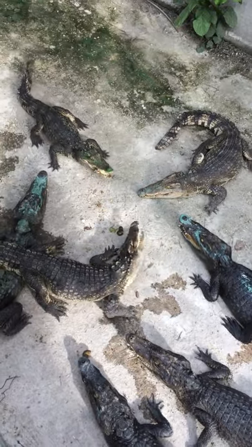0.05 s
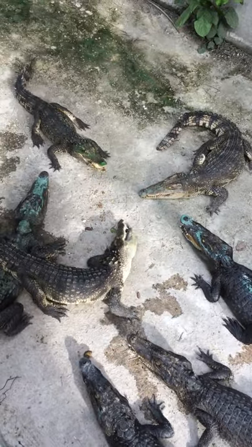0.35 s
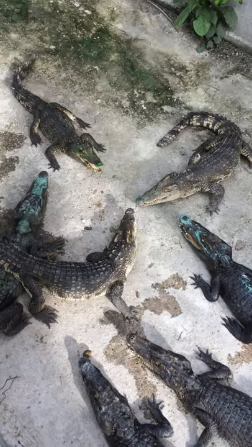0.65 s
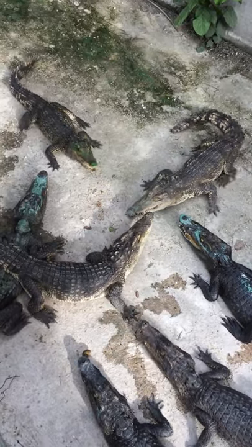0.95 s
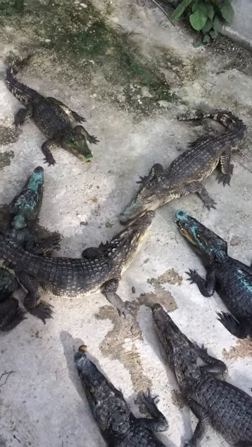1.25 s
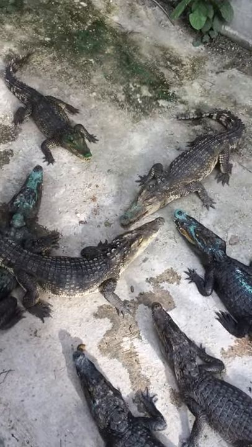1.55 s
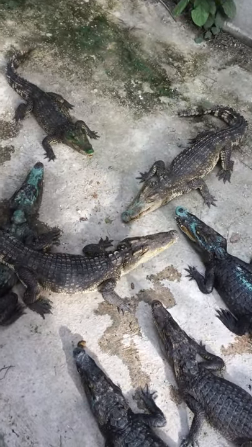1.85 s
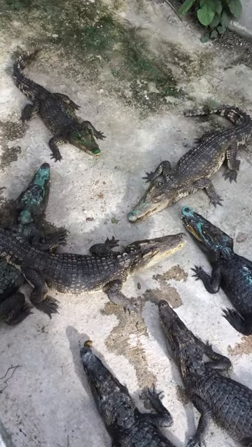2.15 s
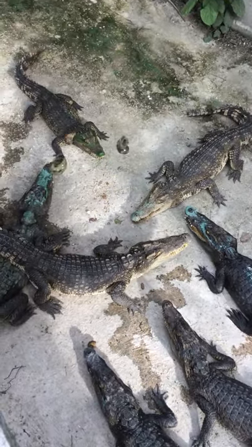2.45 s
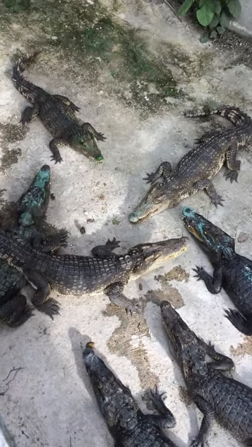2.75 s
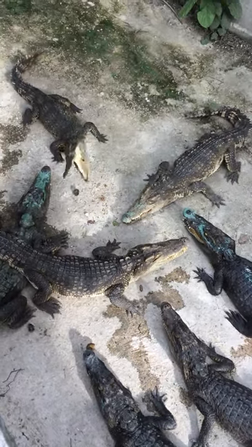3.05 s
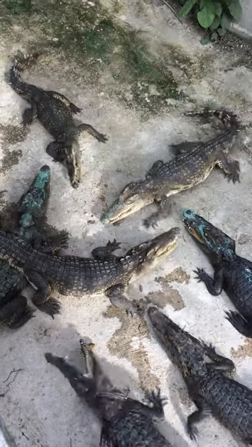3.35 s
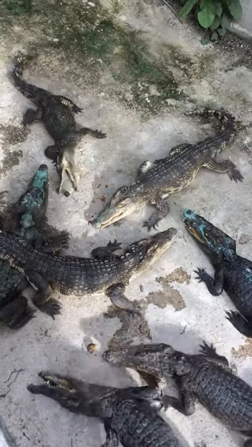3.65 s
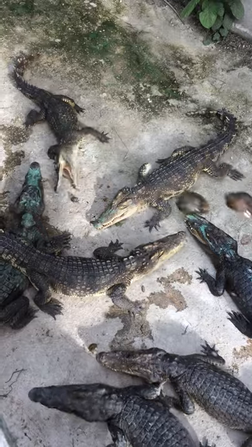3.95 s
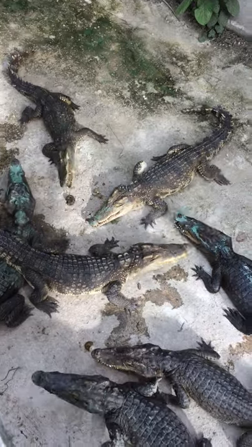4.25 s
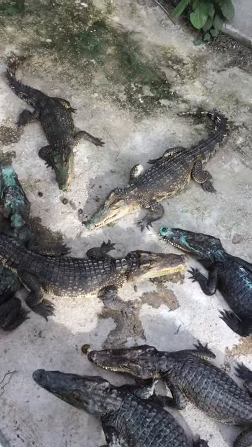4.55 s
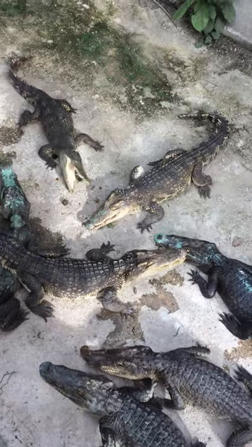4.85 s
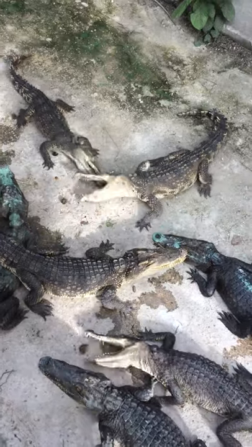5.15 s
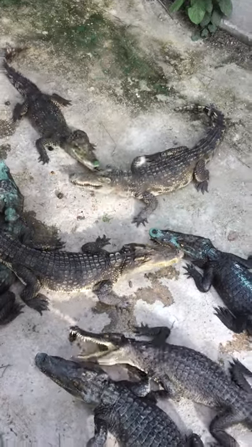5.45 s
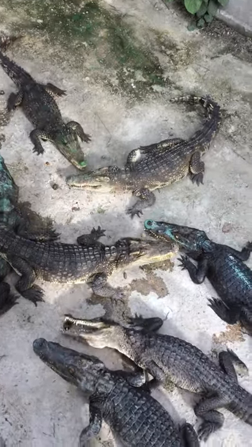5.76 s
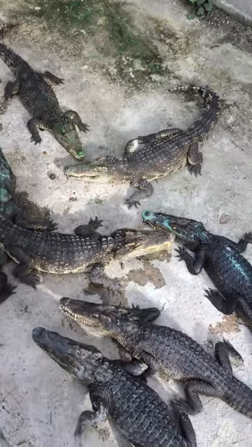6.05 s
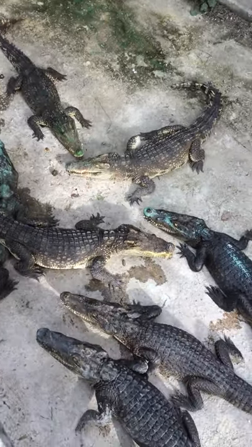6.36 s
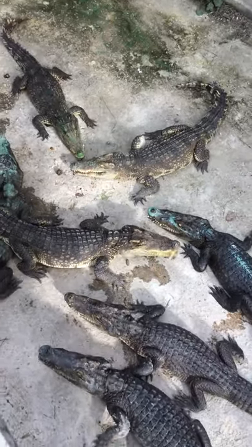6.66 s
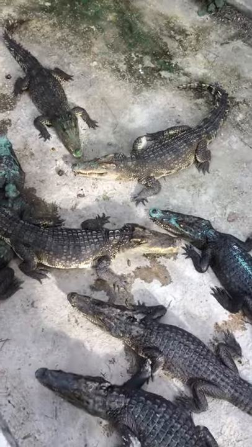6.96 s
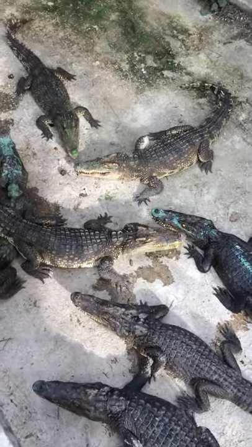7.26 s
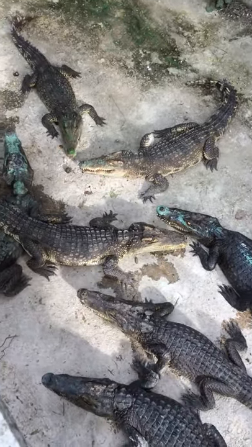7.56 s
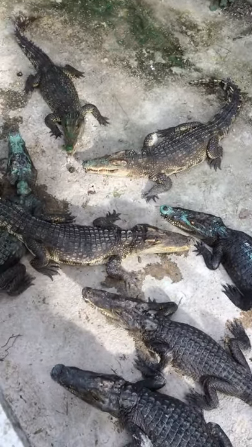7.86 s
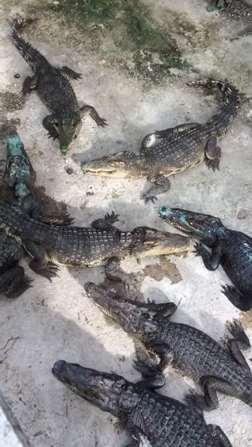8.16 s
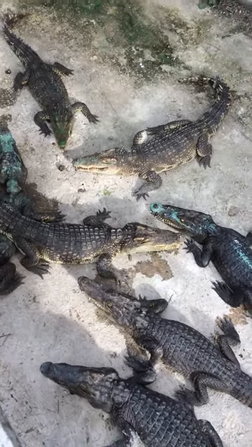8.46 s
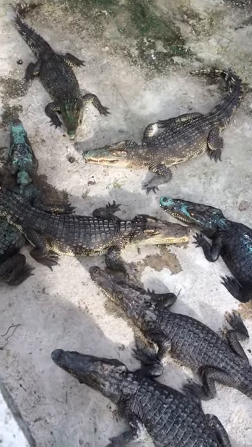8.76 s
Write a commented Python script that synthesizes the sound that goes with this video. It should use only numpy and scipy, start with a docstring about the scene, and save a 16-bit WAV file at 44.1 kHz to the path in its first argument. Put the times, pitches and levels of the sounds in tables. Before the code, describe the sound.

Crocodiles crunch hard shells with sharp, irregular cracks and drag over concrete, while a plastic pail knocks hollowly close by.

```python
"""Feeding time at a concrete crocodile pen, outdoors. First come hollow knocks close to the microphone,
probably a plastic feed pail, while snouts scuff and bellies drag out on the floor. Hard shells crack on
concrete and in jaws, loudest near 3 s and 4.5 s, with gritty crunches between; a faint hum grows.
The pail knocks again after 7 s, and the hardest crunches come last. Throughout, the walls answer briefly
over a low rumble; far whistles, perhaps birds, pass near 2 s and 6 s."""
import sys
import numpy as np
from scipy import signal
from scipy.fft import rfft, irfft, next_fast_len
from scipy.io import wavfile
from scipy.ndimage import map_coordinates

SR = 44100
rng = np.random.default_rng(int(sys.argv[2]) if len(sys.argv) > 2 else 0)


def generate_wav(sig):
    """Save sig (samples, or channels by samples) to the path in sys.argv[1] as 16-bit PCM at SR."""
    pcm = np.round(np.clip(np.atleast_2d(sig).T, -1, 1) * 32767).astype(np.int16)
    wavfile.write(sys.argv[1], SR, pcm)


N = 388962

# shells snapping out in the pen: t/s, crack level/dB, brightness f/Hz, knock level/dB
SHELL_SNAPS = [(0.5989, -36, 8200, -72), (0.998, -38, 4860, -63), (1.068, -48, 4100, -62),
               (1.2072, -49, 5040, -67), (1.4138, -48.5, 4830, -68), (1.6006, -44, 5150, -49),
               (1.7051, -56, 2300, -52), (2.4498, -51, 3520, -49), (2.746, -48, 5430, -56),
               (2.8579, -21.5, 6050, -32), (2.8833, -22.5, 8400, -35.5), (2.8897, -23, 2900, -34),
               (3.048, -45, 5750, -48), (3.0935, -42.5, 4120, -40.5), (3.1695, -45, 6700, -58),
               (3.2191, -36, 3100, -44), (3.295, -39.5, 9100, -47), (3.3732, -26, 5560, -67),
               (3.3885, -70, 3800, -42), (3.443, -38.5, 6350, -66), (3.769, -34, 3970, -52),
               (4.1192, -49.5, 6270, -71), (4.1666, -39, 4170, -68), (4.3616, -46.5, 4100, -71),
               (4.5538, -21.5, 6000, -34.5), (4.5703, -21.5, 9500, -36.5), (4.8491, -32.5, 4400, -47),
               (4.919, -49, 5070, -70), (4.999, -41.5, 4900, -59), (5.0667, -44.5, 4570, -64),
               (5.17, -33, 4170, -71), (5.2104, -34, 5470, -57), (5.872, -37.5, 4960, -48),
               (5.9592, -33.5, 4200, -45), (6.7844, -33.5, 6350, -66)]
# shells giving way: t/s, length/s, splinter level/dB, hollow level/dB, hollow f/Hz
SHELL_CRUNCHES = [(0.467, 0.0056, -40, -49, 1500), (0.797, 0.01, -49.5, -46.5, 1320),
                  (1.218, 0.0085, -48, -58, 1300), (2.469, 0.014, -46.5, -50.5, 1230),
                  (3.533, 0.014, -40, -46, 1080), (3.571, 0.015, -38, -68, 1190),
                  (3.631, 0.027, -41.5, -49, 1100), (4.165, 0.014, -46.5, -44, 1800),
                  (4.267, 0.029, -55, -49.5, 1370), (4.632, 0.014, -37.5, -41, 1400),
                  (4.73, 0.0078, -37, -39, 1320), (4.773, 0.0095, -45.5, -44.5, 1600),
                  (4.806, 0.015, -32, -33, 1530), (4.97, 0.053, -51.5, -69, 1700),
                  (5.361, 0.0089, -50.5, -62, 1400), (5.526, 0.02, -54.5, -59.5, 1390),
                  (5.678, 0.048, -54, -61, 1500), (6.008, 0.011, -47, -51, 1350),
                  (6.224, 0.0091, -54, -48, 1260), (6.451, 0.0043, -53, -49, 1230),
                  (6.701, 0.0062, -46.5, -42.5, 1200), (6.786, 0.025, -42, -44.5, 1400),
                  (7.037, 0.011, -56, -47.5, 1350), (7.463, 0.017, -56.5, -66, 1400),
                  (7.747, 0.0072, -56, -60, 1400), (7.86, 0.014, -58, -59, 1670),
                  (8.103, 0.0085, -58, -49.5, 1370), (8.177, 0.015, -43, -49.5, 1360),
                  (8.215, 0.014, -29, -33, 1466), (8.3982, 0.0027, -36, -27, 1290),
                  (8.421, 0.008, -27.5, -27.5, 1290), (8.434, 0.011, -32.5, -28, 1280),
                  (8.501, 0.009, -37, -36, 1290), (8.5112, 0.01, -26.5, -26.5, 1320),
                  (8.5657, 0.0094, -25, -21, 1325)]
# spectrum of splintering shell: f/Hz, level/dB
SPLINTER_SPECTRUM = [(100, -24), (350, 0), (750, -11), (2000, -0.5), (2800, 2), (4300, 4.5), (6000, 7),
                     (10000, 3.5), (14000, 2), (16000, -14.5)]
# modes of the hollow that a crunch rings: f/Hz, width/Hz, level/dB
HOLLOW_MODES = [(990, 120, -19.5), (1338, 116, 6), (1416, 107, 5), (1526, 150, -1.5), (2400, 250, -9.5),
                (2700, 160, -2.5)]
# blows on the pail, close up: t/s, knock level/dB, knock f/Hz, clack level/dB, clack f/Hz
PAIL_BLOWS = [(0.146, -43.5, 362, -44.5, 1640), (0.232, -47, 352, -56, 1280), (0.38, -38.5, 410, -37, 1440),
              (0.387, -36, 398, -39.5, 1600), (0.425, -51, 560, -43, 1700),
              (0.5524, -37.5, 700, -33.5, 1390), (0.702, -44.5, 470, -43, 1240),
              (0.75, -39.5, 450, -38.5, 1610), (0.859, -44.5, 458, -40.5, 1250),
              (0.956, -32.5, 690, -41.5, 1130), (1.037, -48, 870, -45, 1350),
              (1.074, -39.5, 485, -67, 1140), (1.117, -40, 430, -44.5, 1330), (1.135, -39, 410, -47, 1210),
              (1.215, -43, 786, -48, 1720), (1.2293, -29, 480, -34, 1430), (1.2591, -50, 830, -32.5, 1080),
              (1.4453, -30, 604, -34.5, 1500), (1.468, -32.5, 410, -32, 1120), (1.861, -60, 740, -46, 1070),
              (2.25, -52.5, 740, -45.5, 1110), (2.288, -51, 523, -54, 1180), (7.155, -46, 576, -46, 1410),
              (7.407, -48, 580, -46, 1370), (7.558, -58, 920, -42, 1220), (7.694, -47.5, 600, -48.5, 1460),
              (8.3164, -56, 970, -38.5, 1200)]
# the pail's boom, wall, knock, clack and tick modes: width/Hz
PAIL_MODE_WIDTHS = [26, 45, 270, 480, 1200]
# snouts and bodies scuffing in a lunge: t/s, length/s, level/dB, rasp f/Hz
LUNGES = [(0.099, 0.038, -51.5, 1070), (0.411, 0.073, -50.5, 910), (0.515, 0.025, -50, 1000),
          (0.671, 0.055, -49.5, 1270), (0.775, 0.052, -52.5, 820), (3.582, 0.024, -46.5, 780),
          (3.655, 0.012, -46, 786), (3.711, 0.0085, -34.5, 740), (3.737, 0.026, -44, 850),
          (3.811, 0.036, -48.5, 766), (3.962, 0.021, -55, 795), (4.978, 0.06, -57, 600),
          (5.213, 0.005, -44.5, 900), (5.249, 0.025, -50, 820), (5.92, 0.076, -58.5, 756),
          (8.569, 0.047, -54.5, 596)]
# spectrum of hide slapping concrete: f/Hz, level/dB
SLAP_SPECTRUM = [(60, -17), (160, 5.5), (400, -1.5), (1200, -4.0), (2200, -8.0), (4000, -21), (9000, -48)]
# bellies sliding over the floor: t/s, drag level/dB, grit level/dB
SLIDE_LEVELS = [(0.0, -57.5, -60.5), (0.44, -56, -57), (0.59, -54, -58.5), (1.1, -52, -58),
                (1.25, -60, -66.5), (1.79, -60, -64), (2.26, -65.5, -71), (2.82, -64, -69),
                (3.0, -59.5, -60), (3.54, -52.5, -53.5), (3.71, -49.5, -51), (3.91, -55.5, -59),
                (4.32, -61, -60.5), (4.59, -73, -63), (4.72, -56.5, -53.5), (5.08, -58.5, -54),
                (5.4, -64.5, -60), (6.46, -62.5, -61.5), (6.76, -61.5, -55), (7.1, -65, -60),
                (8.15, -62.5, -64.5), (8.45, -57, -59.5), (8.67, -65.5, -63.5), (8.82, -61, -67)]
# spectra of dragging hide and of the grit under it: f/Hz, level/dB
DRAG_SPECTRUM = [(100, -4), (250, -0.5), (450, 4), (850, -1), (1500, -5.5), (2500, -11), (5000, -16),
                 (12000, -48)]
GRIT_SPECTRUM = [(500, -7.5), (1800, -8), (3700, -2), (6000, -1), (10000, -2.5), (14000, -4.5),
                 (16000, -14)]
# spectra of the open air, its low rumble and its steady hiss: f/Hz, level/dB
RUMBLE_SPECTRUM = [(20, -23), (35, -14), (55, -2), (90, -0.5), (160, 1), (230, -4), (320, -11), (500, -21),
                   (1200, -57)]
HUSH_SPECTRUM = [(100, 1), (400, 0.5), (1200, 3.5), (3000, -6), (8000, -10.5), (15000, -25)]
# far whistles: t/s, length/s, start f/Hz, end f/Hz, level/dB
FAR_WHISTLES = [(1.9, 0.48, 1960, 2050, -79), (6.05, 0.077, 1514, 1510, -65), (6.12, 0.21, 1520, 1510, -71),
                (6.26, 0.17, 1230, 1055, -71)]
# tones of the far hum at its fullest: f/Hz, level/dB
HUM_TONES = [(237, -69), (296, -68.5)]
# reverberation of the pen: f/Hz, time to fall 60 dB/s
PEN_DECAY = [(150, 0.087), (600, 0.31), (1400, 0.29), (4000, 0.3), (10000, 0.3), (16000, 0.16)]
# tone of that reverberation: f/Hz, gain/dB
PEN_COLOUR = [(200, 8.0), (900, 1), (1330, -0.5), (2200, 2.5), (3000, 0.0), (7000, -2.5), (14000, 0)]
# microphone response: f/Hz, gain/dB
MIC_RESPONSE = [(300, 0.5), (500, -1), (1000, 0.5), (2400, 0.5), (4200, 0.5), (6000, -1), (7600, -0.5),
                (10000, 0), (15000, 1.5)]

T = np.arange(4096) / SR  # time within one short event, in seconds


def snaps():
    """A shell breaks in half a millisecond; fragments chatter on and its body gives a short knock."""
    out = np.zeros(N)
    for s, crack_db, bright_hz, knock_db in SHELL_SNAPS:
        # the break runs through the shell as a few quick steps of either sign
        steps = (rng.random(len(T)) < .2) * rng.choice([-1, 1], len(T)) * np.exp(-T / 0.00014)
        spike = unit(0.91 * (T == 0) + steps)
        fragments = rng.standard_normal(len(T)) * np.exp(-T / 0.0018)
        chatter = unit(shell_resonances(fragments, ripple_db=2.8))
        crack = ring(spike + amp(-1) * chatter, bright_hz, 0.83 * bright_hz)
        # a slow break has little treble
        crack = filtered(crack, lambda f: 1 / (1 + (f / (3.04 * bright_hz)) ** 3))
        thrust = chatter + amp(-6) * spike
        body = ring(thrust, 580, 167) - amp(-3) * ring(thrust, 1170, 430)
        knock = ring(body, 470, 1800)
        add(out, s, amp(crack_db) * unit(crack, 0.0058) + amp(knock_db) * unit(knock, 0.0085))
    return out


def crunches():
    """A run of tiny fractures lasts as long as the squeeze and rings the hollow around it."""
    firm_db, tilt_per_db = -30, 0.0259  # a harder squeeze makes finer, brighter splinters
    clear_ring_db, damping_per_db = -15, 0.08  # a fainter ring comes from a more damped hollow
    out = np.zeros(N)
    for s, length, splinter_db, hollow_db, hollow_hz in SHELL_CRUNCHES:
        squeeze = (1 - np.exp(-T / 0.00028)) * release(1.14 * length, .5 * length)
        fractures = squeeze * grains(len(T), spread_db=5)
        tilt = tilt_per_db * (splinter_db - firm_db)
        splinters = coloured(fractures, SPLINTER_SPECTRUM)
        splinters = filtered(splinters, lambda f: np.maximum(f / 2500, 1) ** tilt)
        splinters = unit(shell_resonances(splinters, ripple_db=1.3), length)
        load = fractures * release(0.83 * length, 0.0018)  # drives the hollow while the shell holds
        shift = hollow_hz / HOLLOW_MODES[1][0]  # the modes move together with the strongest one
        damping = 0.5 + damping_per_db * max(clear_ring_db - hollow_db, 0)
        hollow = sum((-1) ** k * amp(db) * ring(load, shift * hz, damping * width)
                     for k, (hz, width, db) in enumerate(HOLLOW_MODES))
        hollow = unit(ring(hollow, 970, 2100)) * np.sqrt(length / T[-1])  # longer squeeze, more energy
        add(out, s, amp(splinter_db) * splinters + amp(hollow_db) * hollow)
    return out


def shell_resonances(x, ripple_db):
    """Every shell has resonances of its own, several hundred hertz apart."""
    ripple = rng.standard_normal(64)
    return filtered(x, lambda f: amp(ripple_db * np.interp(f / 420, np.arange(len(ripple)), ripple)))


def pail_knocks(boom_hz):
    """Close up, each blow lands on another spot of the pail: new pitches over the same boom of its air."""
    wall_hz, tick_hz = 338.5, 2800  # flexing wall, thin rim
    hard_blow_db = -30.5  # below this, boom and tick fall away faster than the blow
    out = np.zeros(N)
    for s, knock_db, knock_hz, clack_db, clack_hz in PAIL_BLOWS:
        boom_db = -31 + 1.58 * (knock_db - hard_blow_db)
        tick_db = -37.5 + 1.6 * (clack_db - hard_blow_db)
        levels = [boom_db, boom_db - 4, knock_db, clack_db, tick_db]
        pitches = [boom_hz, wall_hz, knock_hz, clack_hz, tick_hz]
        for db, hz, width in zip(levels, pitches, PAIL_MODE_WIDTHS):
            rattle = rng.standard_normal(len(T)) * (1 - np.exp(-T / 0.000098)) * np.exp(-T / 0.0061)
            push = 4200 / hz * (T == 0)  # drives the low modes; the rattling load drives the high ones
            mode = ring(ring(push + rattle, hz, width), hz, 0.8 * hz)
            lowpass = signal.butter(3, min(2.3 * hz, 4500), fs=SR, output="sos")
            add(out, s, amp(db) * unit(signal.sosfilt(lowpass, mode), 0.013))
    return out


def pail_rubbing(boom_hz):
    """Rubbing against the pail keeps its air booming softly between the first blows."""
    start_s, end_s, fade_s = 0.067, 0.95, 0.022
    t = np.arange(int(end_s * SR)) / SR
    hold = np.clip(np.minimum(t - start_s, end_s - t) / fade_s, 0, 1)
    friction = rng.standard_normal(len(t))
    boom = ring(ring(friction, boom_hz, PAIL_MODE_WIDTHS[0]), boom_hz, 0.29 * boom_hz)
    out = np.zeros(N)
    add(out, 0, amp(-52.5) * hold * unit(boom))
    return out


def scuffs():
    """Hide hits the concrete and judders over it: a dull slap that runs on into a rasp."""
    out = np.zeros(N)
    for s, length, db, hz in LUNGES:
        contact = (1 - np.exp(-T / 0.00073)) * release(0.99 * length, 0.007)
        judder = contact * grains(len(T), spread_db=1.5)
        slap = coloured(judder, SLAP_SPECTRUM)
        rasp = ring(ring(judder, hz, 250), hz, 1300)
        add(out, s, amp(db) * (unit(slap, length) + amp(-3) * unit(rasp, length)))
    return out


def sliding():
    """Heavy bodies drag over the pen floor in jerks; grit hisses and shell crumbs pop under them."""
    pops_per_s, lowest_hz, range_octaves = 8, 2300, 1.85
    s, drag_db, grit_db = np.transpose(SLIDE_LEVELS)
    t = np.arange(N) / SR
    jerks_db = 2.4 * wobble(55)
    drag = coloured(grains(N, spread_db=-0.5), DRAG_SPECTRUM)
    drag = unit(drag * amp(jerks_db + 2.5 * wobble(110)))
    grit = unit(coloured(grains(N, spread_db=3.5), GRIT_SPECTRUM)) * amp(jerks_db)
    for when, size, pitch in rng.random((int(pops_per_s * N / SR), 3)):
        burst = rng.standard_normal(len(T)) * np.exp(-T / 0.0077)
        hz = lowest_hz * 2 ** (range_octaves * pitch)
        pop = unit(ring(burst, hz, 0.49 * hz), 0.0093)
        add(grit, when * N / SR, amp(1.5 + 11.5 * size ** 2) * pop)
    return amp(np.interp(t, s, drag_db)) * drag + amp(np.interp(t, s, grit_db)) * unit(grit)


def near_wall(x, delay_s=0.0097, echo_db=-9, smear_s=0.0004):
    """Direct sound plus the quick echo of the nearest wall, smeared by its rough face."""
    face = rng.standard_normal(len(T)) * np.exp(-T / smear_s)
    out = x.copy()
    add(out, delay_s, amp(echo_db) * signal.fftconvolve(x, face / np.linalg.norm(face)))
    return out


def pen_reverb(x):
    """Concrete walls scatter each tenth of a second of sound anew into a short tail."""
    out = np.zeros(N)
    step = SR // 10
    starts = range(0, N, step)
    hz, t, scatter = signal.stft(rng.standard_normal((len(starts), SR // 4)), SR, nperseg=256)
    decay = amp(-60 * t / along(PEN_DECAY, hz)[:, None]) * (1 - np.exp(-t / 0.00083))
    tails = signal.istft(scatter * decay, SR, nperseg=256)[1]
    for start, tail in zip(starts, tails):
        add(out, start / SR, signal.fftconvolve(x[start:start + step], tail / np.linalg.norm(tail)))
    return coloured(out, PEN_COLOUR)


def open_air(fall_db_per_s=0.41):
    """The open air around the pen: a low rumble that sways and slowly calms, with a steady hush."""
    level_db = -52 - fall_db_per_s * np.arange(N) / SR - 0.47 * wobble(8.5)
    rumble = amp(level_db) * unit(coloured(rng.standard_normal(N), RUMBLE_SPECTRUM))
    hush = amp(-65) * unit(coloured(rng.standard_normal(N), HUSH_SPECTRUM))
    return rumble + hush


def far_hum():
    """Far off, two low, slightly wavering tones swell midway through."""
    t = np.arange(N) / SR
    swell = amp(np.interp(t, [3.5, 5], [-9, 0]))
    return swell * sum(amp(db) * unit(np.sin(2 * np.pi * hz * t + .5 * wobble(2)))
                       for hz, db in HUM_TONES)


def far_whistles():
    """Thin, gliding whistles, perhaps birds, fade in and out in the distance."""
    out = np.zeros(N)
    for s, length, start_hz, end_hz, db in FAR_WHISTLES:
        size = int(length * SR)
        hz = np.linspace(start_hz, end_hz, size) + 250 * rng.standard_normal(size)
        phase = 2 * np.pi * np.cumsum(hz) / SR
        add(out, s, amp(db) * unit(signal.windows.tukey(size, .7) * np.sin(phase)))
    return out


def amp(db):
    """Decibels to gain."""
    return 10 ** (np.asarray(db) / 20)


def unit(x, seconds=None):
    """x scaled to rms 1, overall or over its first seconds."""
    head = x if seconds is None else x[:int(seconds * SR) + 1]
    return x / np.sqrt(np.mean(head ** 2) + 1e-20)


def along(points, hz):
    """Points (f/Hz, value) read on a log frequency axis."""
    f, v = np.transpose(points)
    return np.interp(np.log(hz + 1), np.log(f + 1), v)


def filtered(x, response):
    """x through a complex frequency response."""
    size = next_fast_len(len(x) + 1024, real=True)
    return irfft(rfft(x, size) * response(np.fft.rfftfreq(size, 1 / SR)), size)[:len(x)]


def coloured(x, spectrum):
    """x shaped by a spectrum (f/Hz, level/dB)."""
    return filtered(x, lambda f: amp(along(spectrum, f)))


def ring(x, hz, width):
    """x through one causal resonance, its width in Hz."""
    return filtered(x, lambda f: 1j * f * width / (hz * hz - f * f + 1j * f * width))


def release(hold_s, decay_s):
    """An envelope that holds at 1, then dies away."""
    return np.exp(-np.maximum(T - hold_s, 0) / decay_s)


def wobble(rate):
    """A smooth random curve, rate knots a second."""
    return map_coordinates(rng.standard_normal(int(N * rate / SR) + 4), [np.arange(N) * rate / SR])


def grains(size, spread_db):
    """Noise made of third-of-a-millisecond grains of unequal strength."""
    strength = np.repeat(rng.standard_normal(size // 14 + 1), 14)[:size]
    return unit(rng.standard_normal(size) * amp(spread_db * strength))


def add(track, s, sound):
    """Mix a sound into the track at time s."""
    part = track[max(round(s * SR), 0):][:len(sound)]
    part += sound[:len(part)]


def scene():
    """From one spot at the pen: the pail close and drier, the animals farther out, open air behind."""
    boom_hz = 216.7  # the air in the pail
    cracks = near_wall(snaps())
    crush = crunches()
    pail = pail_knocks(boom_hz) + pail_rubbing(boom_hz)
    lunges = scuffs()
    walls = pen_reverb(amp(-9.5) * cracks + amp(-9) * crush + amp(-14) * pail + amp(-7.5) * lunges)
    feeding = cracks + crush + pail + lunges + walls + sliding()
    return (feeding + open_air() + far_hum() + far_whistles())[None]


def record(dry):
    """A mono microphone colours the sound slightly and keeps nothing above its band limit."""
    top_hz = 16300
    return np.array([filtered(channel, lambda f: amp(along(MIC_RESPONSE, f)) * (f < top_hz))
                     for channel in dry])


dry = scene()
out = record(dry)
generate_wav(out)
```